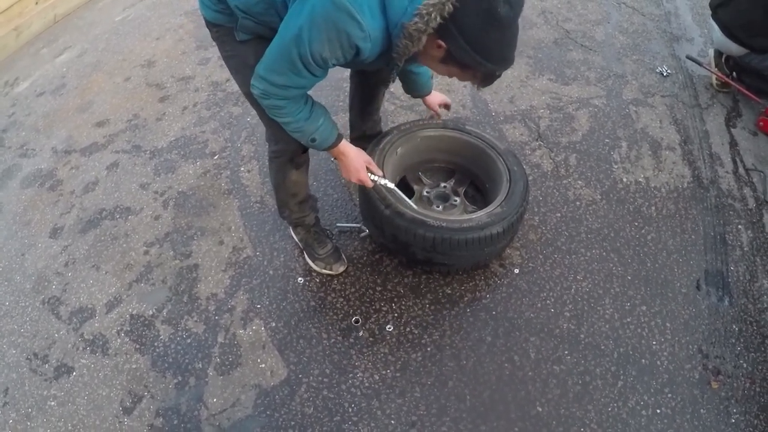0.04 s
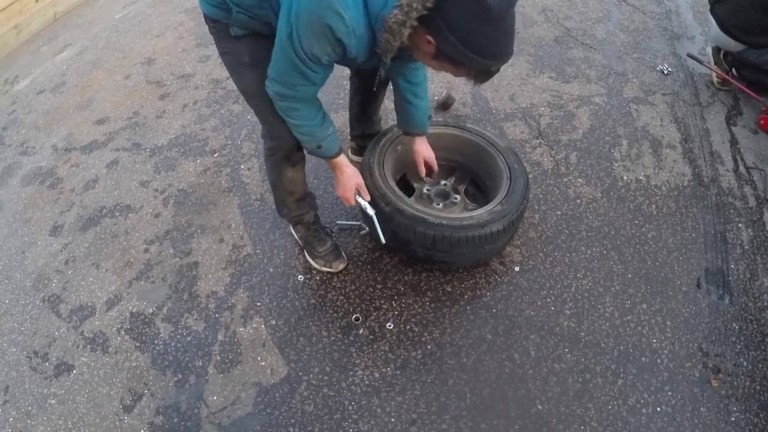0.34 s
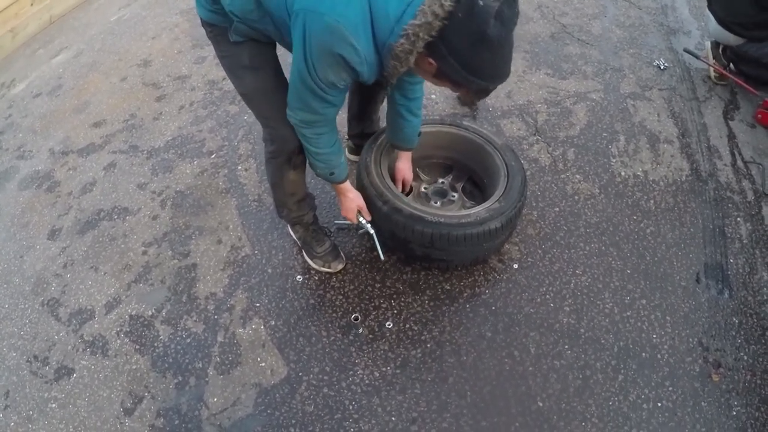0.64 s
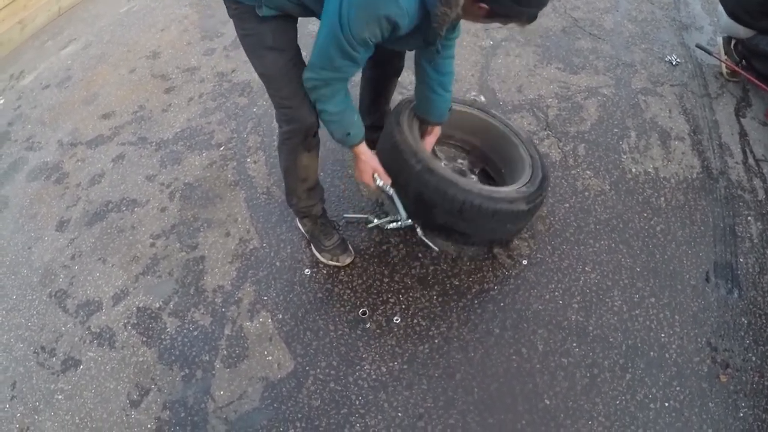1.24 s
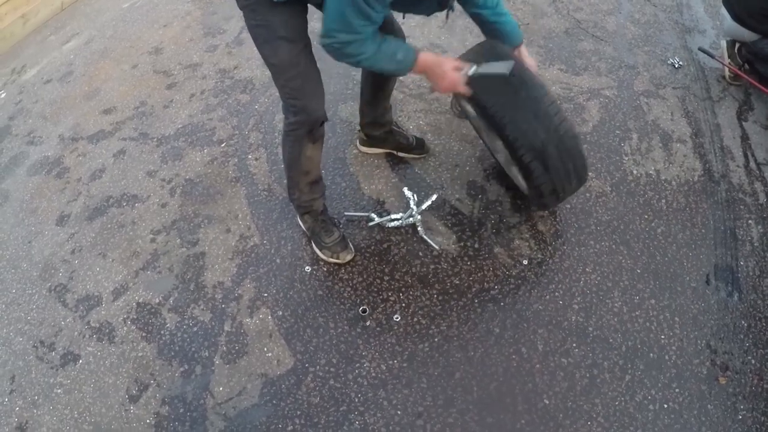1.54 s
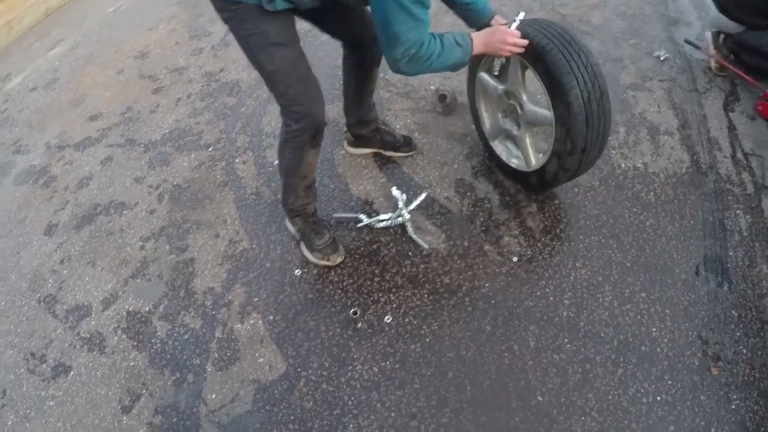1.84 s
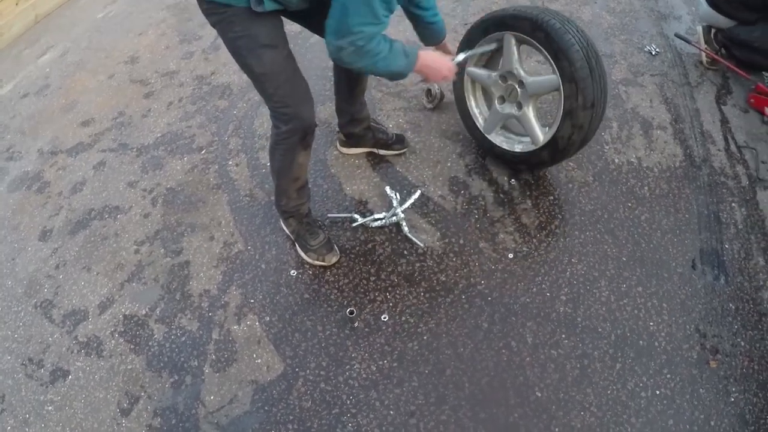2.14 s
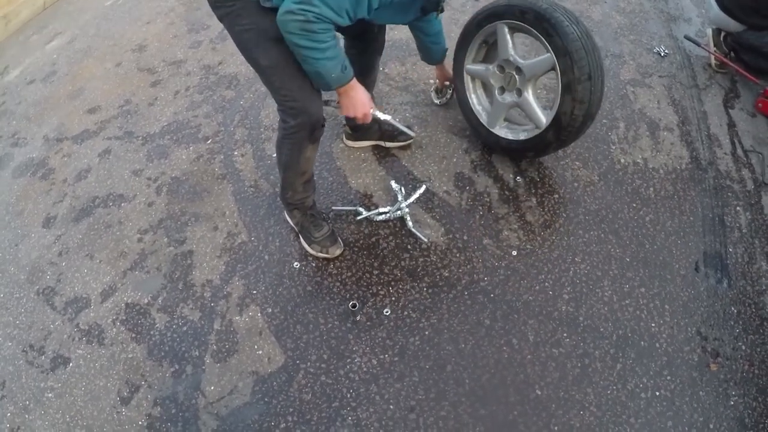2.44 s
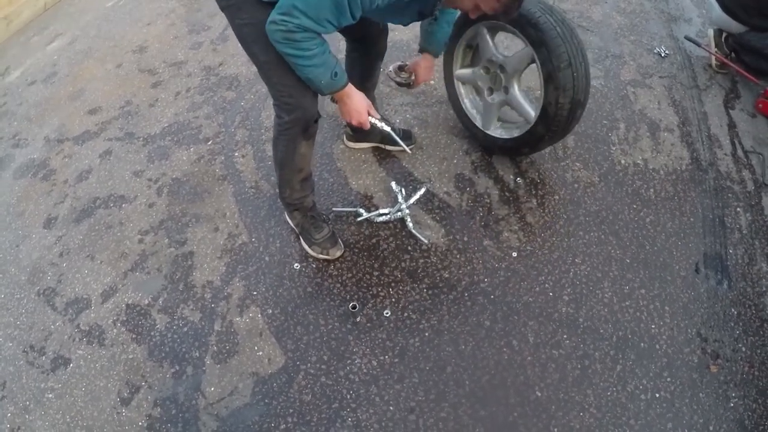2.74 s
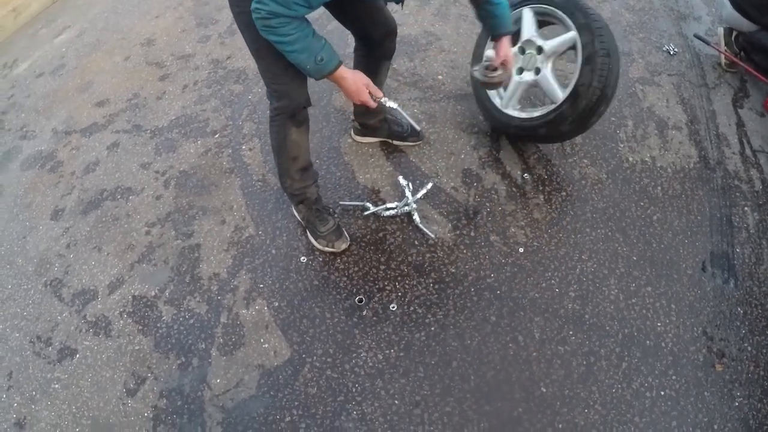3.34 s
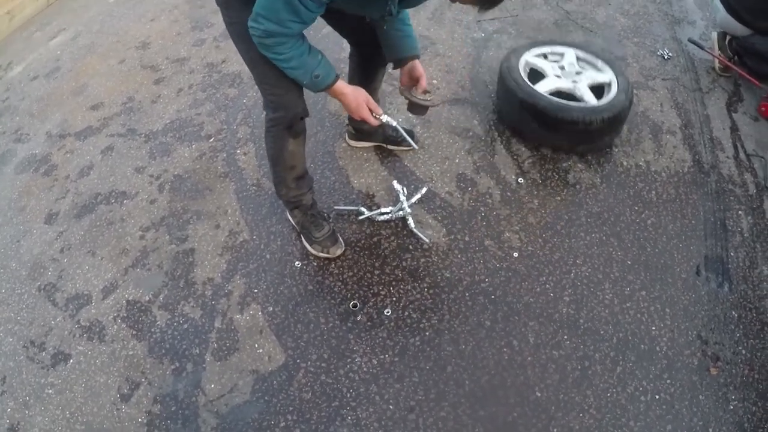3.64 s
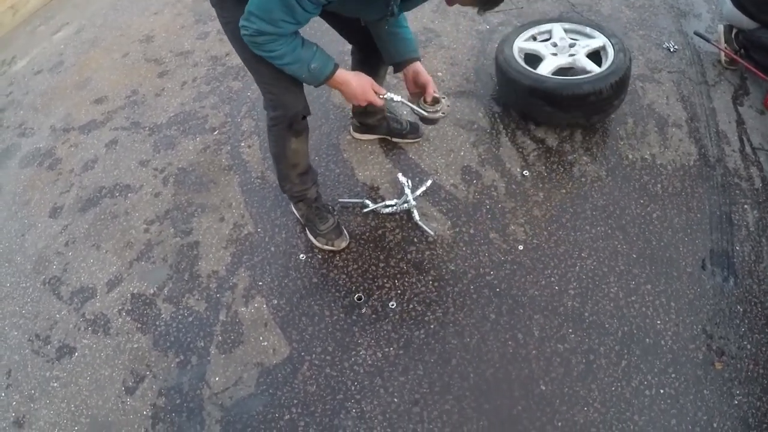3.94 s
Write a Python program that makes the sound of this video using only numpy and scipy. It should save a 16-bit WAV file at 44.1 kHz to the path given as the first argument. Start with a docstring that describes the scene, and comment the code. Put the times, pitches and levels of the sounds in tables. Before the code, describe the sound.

A car wheel falls flat on wet asphalt with a slap and a thud near the end. Before that, a steel tool clinks against the rim and shoes scuff faintly, while outdoor gusts buffet the microphone.

```python
"""A car wheel falls flat on wet asphalt with a slap, a thud and the hum of the air in its tyre,
then rocks twice. Leading up to the fall, a steel tool clinks against the rim, small steel parts
jingle in the hand, and shoes scuff on the grit as the wheel is stood up.
Gusts buffet the microphone throughout, over a faint outdoor background."""
import sys
import numpy as np
from scipy import signal
from scipy.io import wavfile
from scipy.ndimage import uniform_filter1d

SR = 44100
rng = np.random.default_rng(int(sys.argv[2]) if len(sys.argv) > 2 else 0)


def to_wav(sig):
    """Store sig (one row per channel, or 1-D mono) as 16-bit WAV at the path in sys.argv[1].

    Samples outside -1..1 are clipped; the rate is SR.
    """
    pcm = np.clip(np.atleast_2d(sig), -1, 1) * 32767
    pcm = np.round(pcm).astype(np.int16)
    wavfile.write(sys.argv[1], SR, pcm.T)  # frames by channels


N = 176400
T = np.arange(N) / SR


def from_db(db):
    """Decibels to gain."""
    return 10 ** (np.asarray(db) / 20)


def automation(points):
    """A level curve drawn through breakpoints, read at every sample."""
    return np.interp(T, *np.transpose(points))


def drift(rate_hz):
    """Smooth random modulation with a standard deviation of 1."""
    pole = np.exp(-40 * np.pi * rate_hz / SR)  # runs at SR / 20
    slow = signal.lfilter([1], [1, -2 * pole, pole * pole], rng.standard_normal(N // 20 + 2002))[2000:]
    return np.interp(np.arange(N) / 20, np.arange(len(slow)), slow / slow.std())


def levelled(noise, span_s):
    """Noise divided by its running rms, which irons out chance swells."""
    return noise / np.sqrt(uniform_filter1d(noise * noise, max(int(span_s * SR), 8)) + 1e-9)


def noise_bands(colour, count=20, order=2):
    """Coloured noise of total rms 1: (band centres in Hz as a column, one row of noise per band)."""
    hz, db = np.transpose(colour)
    edges = np.geomspace(max(hz[0], 12), min(hz[-1], 19000), count + 1)
    centres = np.sqrt(edges[1:] * edges[:-1])
    white = rng.standard_normal((2, N))
    filters = [signal.butter(order, edges[k:k + 2], "band", fs=SR, output="sos") for k in range(count)]
    rows = np.array([signal.sosfilt(sos, white[k % 2]) for k, sos in enumerate(filters)])
    rows *= from_db(np.interp(np.log(centres), np.log(hz), db))[:, None]
    return centres[:, None], rows / rows.sum(0).std()


def ring(times, levels_db, hz, t60):
    """One struck mode: a decaying sine for each hit."""
    hits = np.zeros(N)
    hits[np.clip((times * SR).astype(int), 0, N - 1)] = from_db(levels_db)
    pole, angle = from_db(-60 / (t60 * SR)), 2 * np.pi * hz / SR
    return signal.lfilter([0, np.sin(angle)], [1, -2 * pole * np.cos(angle), pole * pole], hits + 1e-18)


def metal(times, levels_db, tilts, modes, rough_db=6.5, chatter_s=.000025):
    """Struck metal, each hit with its own mix of modes; loose contact roughens and smears the ring."""
    variation_db = rng.normal(0, 1, (len(times), len(modes)))
    out = np.zeros(N)
    for k, (hz, db, t60) in enumerate(modes):
        hit_db = levels_db + db + tilts * np.log2(hz / 8000) + variation_db[:, k]
        shift_s = chatter_s * 5000 / hz * drift(rate_hz=49)
        smeared = np.interp(T + shift_s, T, ring(times, hit_db, hz, t60))
        out += (-1) ** k * smeared * from_db(rough_db * drift(rate_hz=190))
    return out


def cracks(times, levels_db, tilts, colour, t60, tail_db, tail_s):
    """Each contact is a short noise crack with a weak tail of scatter that dies sooner in the treble."""
    hz, noise = noise_bands(colour, count=28)
    out, age, pitch_ratio = np.zeros(N + SR), T[:SR // 2], hz / 3000
    tail = from_db(tail_db - 60 * age / tail_s * pitch_ratio ** 0.18)
    attack = 1 - np.exp(-age / 0.00021)
    envelope = attack * (from_db(-60 * age / t60) + tail)
    for start, db, tilt in zip(times, levels_db, tilts):
        i = int(start * SR)
        length = min(len(age), N - i)
        burst = noise[:, i:i + length] * envelope[:, :length]
        out[i:i + length] += (burst * from_db(db + tilt * np.log2(pitch_ratio))).sum(0)
    return out[:N]


# colour of the distant outdoors (frequency [Hz], level [dB])
AMBIENCE_COLOUR = [(100, 12.5), (400, 0.5), (900, 5), (1500, -2.5), (2500, -11.5), (4000, -15), (7000, -20),
                   (12000, -24.5), (15000, -35)]


def ambience(level_db=-52.5):
    """A faint, steady bed of outdoor noise."""
    return from_db(level_db) * noise_bands(AMBIENCE_COLOUR)[1].sum(0)


# swells of the wind's low end (time [s], level [dB])
RUMBLE_SWELLS = [(0, -3), (.1, -33), (.2, -17), (.44, -15.5), (.53, -19), (.7, -17.5), (.85, -18.5),
                 (.94, -34.5), (1.04, -19), (1.15, -24), (1.19, -14), (1.38, -15), (1.51, -18),
                 (1.56, -13.5), (1.6, -20), (1.84, -24), (1.95, -19), (2.19, -28), (2.29, -25.5),
                 (2.42, -29), (2.47, -14), (2.56, -23.5), (2.68, -16.5), (2.9, -26), (2.96, -21),
                 (3.08, -31.5), (3.23, -32.5), (3.29, -23), (3.39, -20.5), (3.43, -23), (3.5, -15),
                 (3.59, -22.5), (3.64, -14), (3.71, -31.5), (3.9, -22), (3.99, -16)]
# colour of that low end (frequency [Hz], level [dB])
RUMBLE_COLOUR = [(20, -3), (40, 3), (70, 2), (110, -3.5), (160, -9.5), (260, -42.5), (500, -61)]


def wind_rumble(strong_db=-15.5, brightening=0.59):
    """Deep wind on the microphone, opening up as it swells."""
    hz, noise = noise_bands(RUMBLE_COLOUR, count=9)
    swell_db = automation(RUMBLE_SWELLS)
    tilt_db = brightening * np.log2(hz / 50) * (swell_db - strong_db)
    return levelled((noise * from_db(tilt_db)).sum(0), span_s=.09) * from_db(swell_db)


# single eddies hitting the microphone (time [s], level [dB], pitch [Hz])
EDDY_HITS = [(0.028, -9, 435), (.068, -5.5, 486), (.199, -5, 557), (.214, 4, 605), (.252, 0.5, 580),
             (.301, -15, 480), (.328, -1, 520), (.360, -4.5, 527), (0.43, -11, 234), (.459, -2, 473),
             (0.52, -10, 403), (.541, -21, 474), (0.564, -9.5, 334), (0.585, -18.5, 504),
             (1.188, -6.5, 168), (1.243, -2.5, 664), (1.265, -3.5, 477), (1.284, -0.5, 490),
             (1.31, -5.5, 454), (1.326, 0.5, 460), (1.367, -4, 112), (1.378, -5, 338), (1.387, -5.5, 560),
             (1.425, -19, 580), (1.467, -9.5, 287), (1.55, -11, 93), (1.654, -19, 417), (1.698, -19.5, 450),
             (1.911, -11.5, 490), (1.962, -17, 330), (2.474, -14.5, 363), (3.371, -11.5, 130),
             (3.471, -14.5, 300), (3.492, -3.5, 97.4), (3.521, -8.5, 69.3), (3.53, -11, 251),
             (3.54, -4, 335), (3.624, -17.5, 310), (3.639, -12, 264)]


def eddy_thumps(t60_cycles=3.58, attack_s=0.0016):
    """An eddy bursts on the microphone port as one heavily damped swing of pressure."""
    out, age = np.zeros(N + SR), T[:SR // 10]
    for start, db, hz in EDDY_HITS:
        i = int(start * SR)
        envelope = from_db(db - 60 * age * hz / t60_cycles) * (1 - np.exp(-age / attack_s))
        out[i:i + len(age)] += 2 * envelope * np.sin(2 * np.pi * hz * age)
    return out[:N]


# colour of a sharp eddy's crackle (frequency [Hz], level [dB])
CRACKLE_COLOUR = [(350, 8.5), (750, 7), (1100, -7), (1500, -16), (3000, -36)]


def eddy_crackle(level_db=-21, t60=0.055, top_hz=2000):
    """A noise layer on each thump: the faster the eddy, the more it crackles."""
    times, db, hz = np.transpose(EDDY_HITS)
    hits = np.zeros(N)
    hits[(times * SR).astype(int)] = from_db(db + level_db) * (hz / hz.max()) ** 3
    envelope = signal.lfilter([1], [1, -from_db(-60 / (t60 * SR))], hits + 1e-18)
    noise = noise_bands(CRACKLE_COLOUR, count=8, order=4)[1].sum(0)
    return signal.sosfilt(signal.butter(4, top_hz, fs=SR, output="sos"), envelope * noise)


# gusts at the microphone (time [s], level [dB])
GUSTS = [(0, -9.5), (.035, -18), (.08, -17), (.11, -31.5), (.14, -17), (.18, -16.5), (.215, -9),
         (.285, -19.5), (.315, -7.5), (.347, -21), (.37, -11), (.41, -24), (.44, -10), (.495, -34),
         (.57, -23.5), (.62, -34.5), (.83, -49.5), (.96, -56.5), (1.15, -42), (1.22, -32), (1.25, -15.5),
         (1.335, -18.5), (1.355, -34), (1.385, -19.5), (1.41, -41.5), (1.435, -20), (1.5, -55), (1.57, -32),
         (1.62, -42.5), (1.82, -37.5), (1.86, -50), (1.915, -30), (1.98, -38), (2.15, -69), (2.39, -64),
         (2.47, -29), (2.53, -53), (2.66, -37), (2.85, -68), (3.44, -64), (3.48, -36.5), (3.53, -43.5),
         (3.57, -69), (3.635, -35.5), (3.7, -58)]
# colour of their buffeting (frequency [Hz], level [dB])
BUFFET_COLOUR = [(70, -6), (130, 4), (200, 5), (320, 4), (500, -5.5), (800, -15), (1300, -33),
                 (2200, -41.5), (3500, -50)]


def wind_buffet(level_db=-1.5, strong_db=-9, brightening=0.34, flutter_db=2.5, burst_db_per_octave=3):
    """Fluttering eddies grow louder and brighter with the gust; brief bursts lift their top end."""
    hz, noise = noise_bands(BUFFET_COLOUR, count=14, order=4)
    gust_db = automation(GUSTS) + flutter_db * np.clip(drift(rate_hz=47), -2, 2)
    band_flutter_db = flutter_db * np.array([drift(rate_hz=57) for _ in hz])
    octaves = np.minimum(np.log2(hz / 350), 2)
    tilt_db = brightening * octaves * (gust_db - strong_db)
    burst_db = burst_db_per_octave * np.maximum(octaves, 0) * np.clip(drift(rate_hz=230), -2, 2)
    steady = np.array([band.std() * levelled(band, span_s=0.037) for band in noise])
    return (steady * from_db(level_db + gust_db + tilt_db + burst_db + band_flutter_db)).sum(0)


def wind(top_hz=2070):
    """The wind mix: rumble, low-passed buffeting and thumps, and crackle."""
    lowpass = signal.butter(4, top_hz, fs=SR, output="sos")
    return wind_rumble() + signal.sosfilt(lowpass, wind_buffet() + eddy_thumps()) + eddy_crackle()


# stones cracking under shoe and tyre (time [s], level [dB], tilt [dB/octave])
STONE_TICKS = [(0.8625, -41, -2), (1.0925, -45.5, -3), (1.131, -49.5, 2.5), (1.179, -55, 4),
               (2.0768, -54, 12), (2.1, -56, 10), (2.472, -53.5, 12), (2.493, -59, 10.5), (2.9842, -45, 0),
               (3.790, -39.5, 4), (3.939, -41, 0.5)]
# shoe scuffs (peak time [s], half width [s], level [dB])
SHOE_SCUFFS = [(.81, 0.021, -61), (.89, 0.017, -59), (1.03, 0.06, -61.5), (1.135, 0.02, -64),
               (1.803, 0.0096, -55.5), (1.88, 0.063, -64.5), (2.093, 0.021, -52.5), (2.34, 0.012, -58.5),
               (2.705, 0.024, -55), (3.943, 0.0049, -47)]
# colour of the grit (frequency [Hz], level [dB])
GRIT_COLOUR = [(500, 10), (1400, 4.5), (2300, 3.5), (3600, 1.5), (4500, -0.5), (5700, -2.5), (7500, -5.5),
               (11000, -12.5), (15000, -20)]


def grit(grain_db=3.5):
    """Single stones crack, and soles drag over the grains in short, rough swells."""
    ticks = cracks(*np.transpose(STONE_TICKS), GRIT_COLOUR, t60=0.019, tail_db=-16, tail_s=0.14)
    drag = sum(from_db(db) * np.exp(-.5 * ((T - peak) / width) ** 2) for peak, width, db in SHOE_SCUFFS)
    texture = noise_bands(GRIT_COLOUR)[1].sum(0) * from_db(grain_db * drift(rate_hz=180))
    return ticks + drag * texture


# touches between small steel parts (time [s], level [dB], tilt [dB/octave])
JINGLE_HITS = [(1.1293, -53, 0), (1.1762, -50, 4.5), (2.0582, -62, 8), (2.0777, -45.5, -2),
               (2.102, -52, -1), (3.9385, -44, -1)]
# modes of those parts (frequency [Hz], level [dB], t60 [s])
PART_MODES = [(1357, -8, 0.14), (3560, -2.5, 0.076), (4310, -8, .02), (4460, -11, 0.022), (5100, -9, 0.04),
              (5730, -11, 0.05), (6200, -3.5, 0.044)]


def jingles():
    """Small steel parts touch in the hand and ring briefly."""
    return metal(*np.transpose(JINGLE_HITS), PART_MODES)


# tool hits on the rim (time [s], ring [dB], tip chink [dB], rim knock [dB], ring tilt [dB/octave])
TOOL_HITS = [(0.1276, -31, -36, -10, 0.5), (0.1476, -54, -63, -24.5, -5), (.185, -64, -61, -32.5, -4),
             (0.4283, -41, -28.5, -26, -9), (.4648, -37, -51, -40, 4), (.470, -50, -53, -47, 8),
             (.492, -62, -50, -48, 2), (0.6176, -67, -72, -54, -12)]
# modes of the steel tool (frequency [Hz], level [dB], t60 [s])
TOOL_MODES = [(4990, -11, 0.055), (5100, 2, 0.039), (5130, -16, 0.36), (5160, -14, 0.32), (5300, -3, 0.046),
              (8400, -19, 0.22), (9120, -17.5, 0.24), (9000, -1.5, 0.065), (12060, -17.5, 0.31),
              (12490, -2.5, 0.14)]
# tight modes of its tip (frequency [Hz], level [dB], t60 [s])
TIP_MODES = [(8470, -4.5, 0.021), (9800, -20, 0.088), (10100, -25, 0.075), (10270, 2, 0.04),
             (10870, -4, 0.028), (11700, -5.5, 0.088), (11800, -7, 0.052)]
# colour of a knock on the rim (frequency [Hz], level [dB])
KNOCK_COLOUR = [(200, 0), (750, 10.5), (1150, -5.5), (1450, 11), (1950, -4.5), (2300, 5.5), (2750, 8),
                (3300, -12.5), (3900, -2.5), (4400, -25), (5200, -0.5), (6200, -14), (7300, -24),
                (8600, -14), (10000, -5), (12500, -24.5), (15000, -35.5)]


def tool_clinks(rattle_db=-68.5, rattle_slope_db_per_s=15):
    """The tool rings high over the rim's short knock, and trembles against it in a fading rattle."""
    times, ring_db, tip_db, knock_db, tilts = np.transpose(TOOL_HITS)
    first_s, last_s = 0.3, 0.85  # the rattle falls to rattle_db at last_s
    touches = np.linspace(last_s, first_s, num=24) + rng.uniform(-.01, .01, 24)
    steel = metal(times, ring_db, tilts, TOOL_MODES)
    chink = metal(times, tip_db, 0, TIP_MODES)
    rattle = metal(touches, rattle_db + rattle_slope_db_per_s * (last_s - touches), -1, TOOL_MODES)
    no_tilt = np.zeros_like(times)
    knock = cracks(times, knock_db, no_tilt, KNOCK_COLOUR, t60=0.013, tail_db=-17, tail_s=0.15)
    return steel + chink + rattle + knock


# the wheel lands and rocks (time [s], tyre [dB], rim [dB], slap [dB], slap tilt [dB/octave])
WHEEL_HITS = [(3.7335, -4.5, -22.5, -5, -1), (3.846, -31, -42.5, -43.5, -3.5), (3.928, -44, -52, -55, -7),
              (3.9379, -30.5, -61, -52, 1)]
# modes of the tyre's bounce and the air inside (frequency [Hz], level [dB], t60 [s])
TYRE_MODES = [(121.6, 1, 0.19), (152, 3.5, 0.095), (209, 4.5, 0.065), (253, -13, 0.81), (300, -17, 0.23),
              (580, -22, 0.11)]
# modes of the rim (frequency [Hz], level [dB], t60 [s])
RIM_MODES = [(1300, -2, .1), (1590, -7, 0.15), (1673, 1.5, 0.041), (2200, -24, 0.046), (2560, -20.5, 0.06),
             (3120, -3, .05), (3720, -6, 0.076)]
# colour of wet rubber slapping asphalt (frequency [Hz], level [dB])
SLAP_COLOUR = [(100, 15.5), (500, -6), (950, -1), (1400, 0.5), (2200, -1), (2750, 0.5), (3600, -7.5),
               (5000, -12.5), (7000, -12), (8800, -22), (10500, -7), (12500, -23), (15000, -18)]


def wheel_drop(thud_lag_s=0.0031, shoulder_lead_s=0.0032, shoulder_db=-13.5, echo_s=.00579, echo_db=-3):
    """The sidewall slaps the ground, with one close echo; tyre, enclosed air and rim ring on."""
    times, tyre_db, rim_db, slap_db, tilts = np.transpose(WHEEL_HITS)
    tyre = sum(ring(times + thud_lag_s, tyre_db + db, hz, t60) for hz, db, t60 in TYRE_MODES)
    rim = metal(times + thud_lag_s, rim_db, 0, RIM_MODES)
    slap = cracks(times, slap_db, tilts, SLAP_COLOUR, t60=0.017, tail_db=-22, tail_s=0.2)
    # the tyre's shoulder touches just before the sidewall: a softer, duller pre-hit
    early_slap = np.interp(T + shoulder_lead_s, T, slap)
    shoulder = from_db(shoulder_db) * signal.lfilter([.3], [1, -.7], early_slap)
    echo = from_db(echo_db) * np.interp(T - echo_s, T, slap)
    return tyre + rim + shoulder + slap + echo


def scene():
    """All layers mixed in mono at one microphone."""
    return (ambience() + wind() + tool_clinks() + jingles() + wheel_drop() + grit())[None]


def record(dry, cutoff_hz=15100):
    """The highest peaks soft-clip at full scale, and a steep low-pass trims the top."""
    clipped = dry / (1 + dry ** 8) ** (1 / 8)
    return signal.sosfilt(signal.ellip(10, .1, 80, cutoff_hz, fs=SR, output="sos"), clipped)


dry = scene()
out = record(dry)
to_wav(out)
```